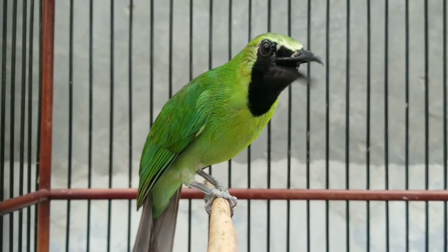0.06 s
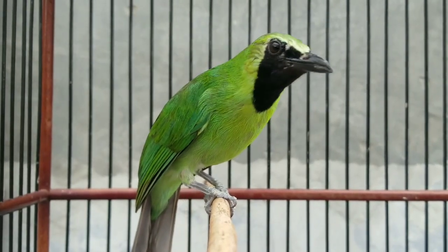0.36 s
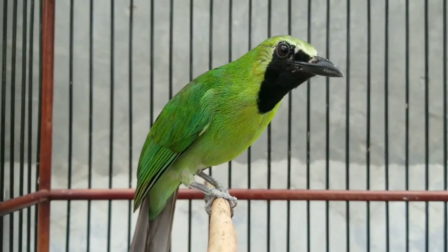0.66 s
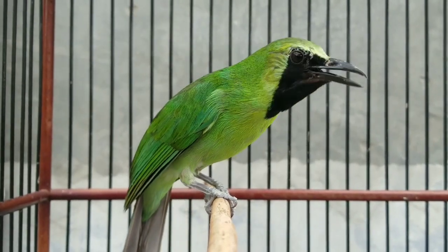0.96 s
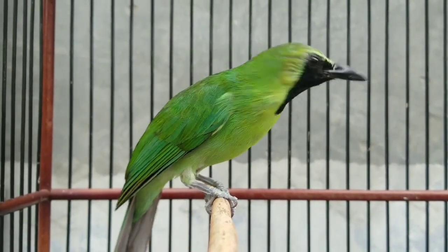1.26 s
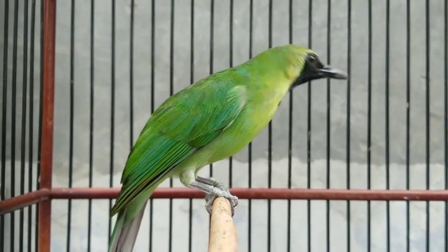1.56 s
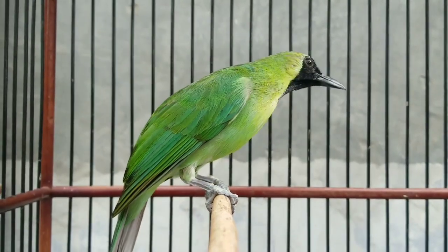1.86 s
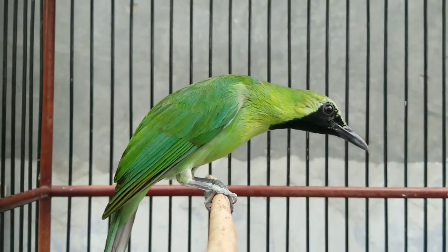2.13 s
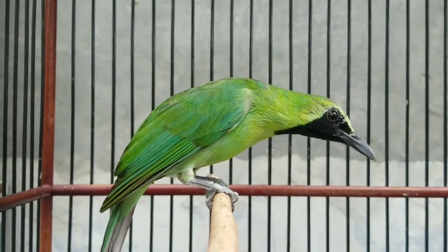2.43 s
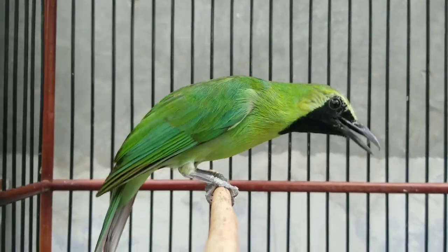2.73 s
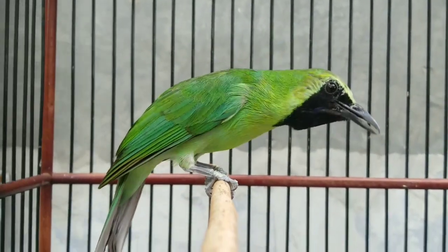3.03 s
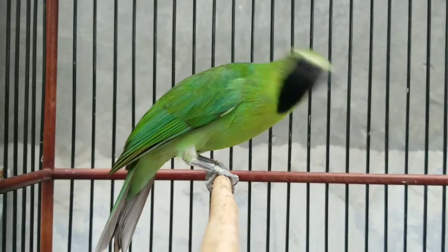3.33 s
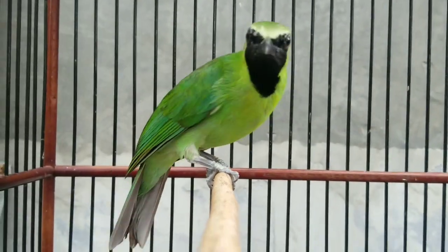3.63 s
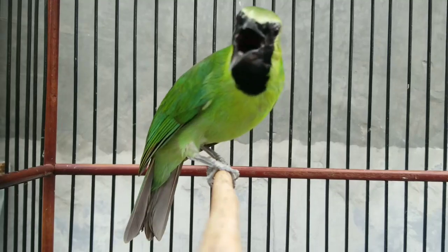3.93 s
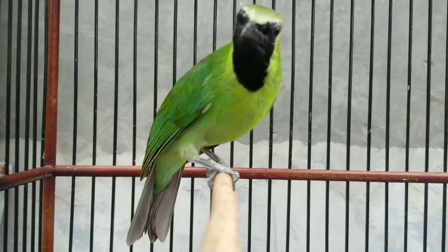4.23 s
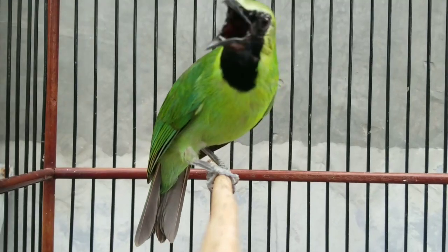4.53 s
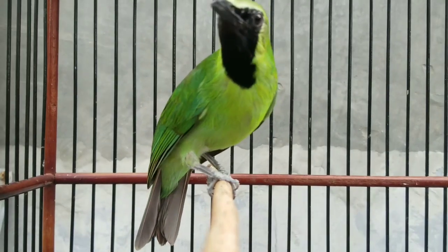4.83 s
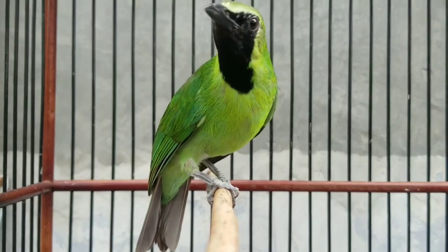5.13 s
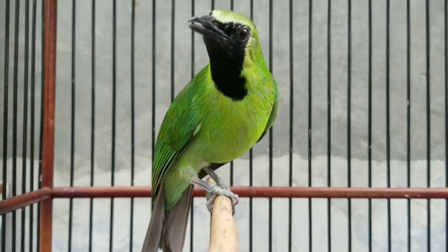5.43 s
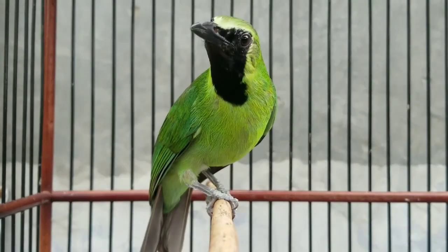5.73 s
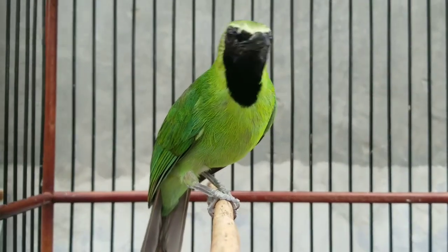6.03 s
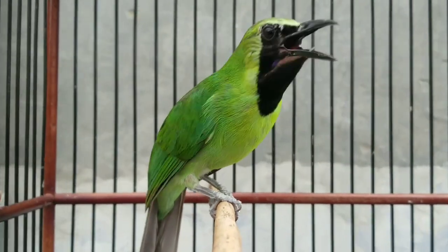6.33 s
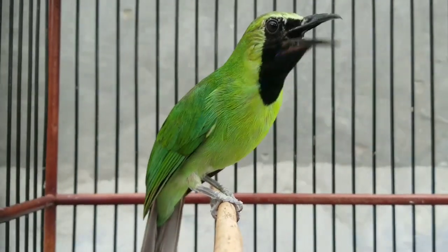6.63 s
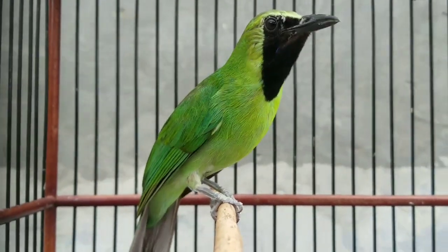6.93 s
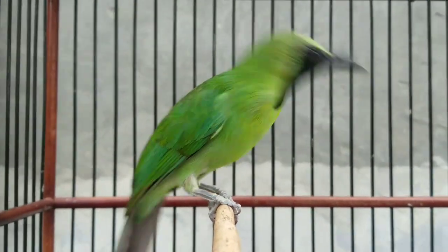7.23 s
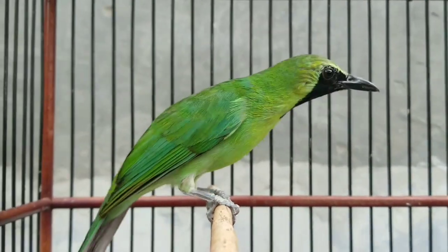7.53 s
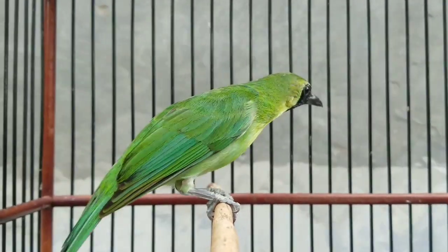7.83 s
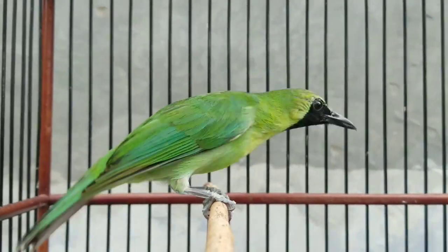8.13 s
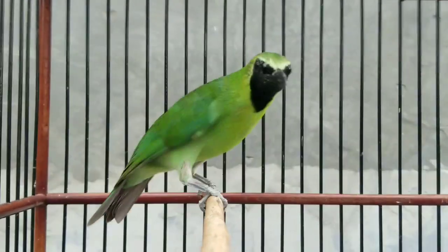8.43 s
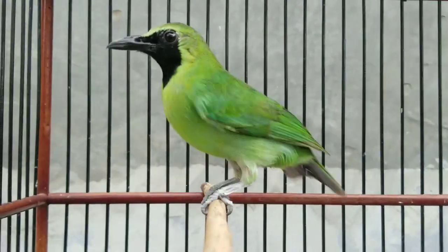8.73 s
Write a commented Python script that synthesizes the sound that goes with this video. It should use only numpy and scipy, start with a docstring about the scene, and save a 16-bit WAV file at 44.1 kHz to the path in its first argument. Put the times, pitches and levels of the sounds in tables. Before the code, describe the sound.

Loud, close birdsong in stereo, in a slightly echoing space. The bird opens with three quick chips and some downward slides, then gives a hoarse falling buzz, a piercing squeal, a short squeak and a pair of clear whistles. The singing stops, and a few light, briefly ringing thumps follow as it hops on its perch. Quiet rumble, hum, high hiss and far-off chirps lie underneath.

```python
"""A leafbird in a wire cage.

Close to a stereo microphone it sings three chips, falling slurs, a buzz, a squeal, a squeak and two
whistles, then hops on its perch, which rings. The two sides of its syrinx are separate oscillators;
where they overlap they beat and rasp. A faint room tail follows each note, over low rumble, a drone
and a hum, high hiss and far-off glides."""
import sys
import numpy as np
from scipy import signal
from scipy.fft import rfft, irfft, next_fast_len
from scipy.io import wavfile
from scipy.ndimage import uniform_filter1d, minimum_filter1d

SR = 44100
rng = np.random.default_rng(int(sys.argv[2]) if len(sys.argv) > 2 else 0)


def unload_wav(signal):
    """Save mono or channel-first audio to the path in sys.argv[1] as 16-bit WAV at rate SR, clipped to [-1, 1]."""
    wavfile.write(
        sys.argv[1],
        SR,
        np.round(np.clip(np.atleast_2d(signal).T, -1, 1) * 32767).astype(np.int16),
    )


N = 387198
TIME = np.arange(N) / SR

# Each row: start and length in seconds, top pitch in Hz, level in dB, lead of the flick in seconds,
# its pitch in Hz, its level in dB, roughness from 0 to 1, air hiss in dB.
CHIPS = [(0.048, 0.037, 3610, -11, .007, 4700, -33, 0.2, -20),
         (0.279, .029, 3470, -10, .012, 4430, -21.5, 0.25, -18),
         (0.496, 0.039, 3653, -10, .002, 4100, -43, 0.11, -28.5)]
# Glides of one side of the syrinx. Each row: start and end in seconds, first, middle and last pitch in Hz,
# level and swell in dB, attack and release in seconds, overtones in dB, final sag and quaver depth in Hz.
SLURS = [(0.745, .94, 3680, 3012, 2830, -19, -4, 0.018, 0.11, -30.5, -5, 3.5),
         (0.853, 1.006, 2760, 2498, 2240, -16, 4, 0.086, .025, -36, 40, -4),
         (2.613, 2.872, 4490, 3636, 2694, -18.5, 12.5, 0.016, 0.053, -31, 10, 58),
         (2.831, 3.014, 2450, 2397, 2340, -18.5, -2, 0.091, 0.018, -36, 81, 15.5),
         (3.009, 3.144, 2190, 2005, 1835, -17, 1.5, 0.023, 0.016, -31.5, 320, 0),
         (3.816, 4.129, 2440, 2354, 1772, -15, 2, 0.2, 0.021, -28.5, 250, -4),
         (4.39, 4.467, 2493, 2742, 2267, -20, -0.5, 0.019, 0.044, 4.5, -3, 0)]
# Calls of the high side. Each row: time in seconds, pitch in Hz, level in dB, overtones in dB.
BUZZ = [(3.797, 3300, -34.5, -37), (3.822, 4950, -23.5, -17), (3.843, 4132, -6, -30),
        (3.89, 3750, -7.5, -31), (3.91, 3704, -7, -33), (3.946, 2887, -7.5, -25), (3.99, 2700, -16, -30),
        (4.045, 2516, -18, -49), (4.115, 2165, -32, -27)]
SQUEAL = [(4.383, 4300, -27, -16), (4.404, 5020, -12.5, -25), (4.423, 5520, -7.5, -26),
          (4.465, 4530, -11.5, -16.5), (4.512, 4040, -6, -19.5), (4.595, 3476, -10.5, -26.5),
          (4.63, 3673, -4.5, -13), (4.65, 3556, -15.5, -18), (4.664, 3110, -27, -25)]
SQUEAK = [(5.487, 5550, -36.5, -13), (5.504, 5900, -23.5, -6), (5.512, 6000, -12.5, -1.5),
          (5.52, 6010, -17, -0.5), (5.543, 5460, -15, -3.5), (5.556, 5040, -13, -11),
          (5.569, 4655, -13, -27), (5.585, 4550, -7, -29.5), (5.606, 4670, -26.5, -18)]
# Each row: starts of lead-in, rise, hold and close in seconds, lead-in pitch in Hz, the four levels in dB.
WHISTLES = [(6.22, 6.266, 6.346, 6.476, 2493, -24.5, -28, -14, -23),
            (6.614, 6.647, 6.697, 6.866, 2380, -31.5, -30.5, -13.5, -14)]
# The held note, one list for each whistle. Each row: time in seconds, pitch in Hz.
HELD_PITCH = [
    [(6.352, 2730), (6.356, 2690), (6.402, 2454), (6.436, 2511), (6.472, 2503)],
    [(6.708, 2592), (6.764, 2590), (6.778, 2530), (6.828, 2562), (6.864, 2463)],
]
# Hoarse stretches. Each row: start and end in seconds, roughness from 0 to 1, flutter rate in Hz,
# air hiss in dB against the tone.
RASPS = [(.815, .93, 0.11, 103.9, -39), (2.83, 2.891, 0.31, 256.6, -37), (3.79, 3.973, 0.05, 202.3, -20),
         (3.905, 4.19, 0.37, 232.1, -20), (4.37, 4.535, 0.06, 241.3, -22.5), (3.79, 3.835, .3, 250.5, -22),
         (5.48, 5.596, .07, 194.5, -20.5), (6.47, 6.525, 0.31, 317, -19), (6.612, 6.659, 0.2, 304, -50)]
# The voice catches for an instant. Each row: time in seconds, dip in dB.
CATCHES = [(.828, -13.5), (0.867, -7), (2.781, -9), (3.867, -24), (4.502, -11), (5.544, -4.5)]
# Relative levels of the second to sixth harmonics in dB.
HARMONICS_DB = [-1, -9.5, -9, -16, -8.5]
# Colour that throat and beak give the overtones. Each row: frequency in Hz, gain in dB.
THROAT_GAIN = [(4000, 1.5), (5500, 2), (7200, -2.5), (8300, -1.5), (10500, 2.5), (12500, -3), (14000, 0.5),
               (16000, -5.5)]
# Where the head points. Each row: start in seconds, left over right in dB, left lead in radians at
# 3000 Hz, left lead in ms, left and right echo delays in ms, left and right echo shares.
HEAD_POSES = [(0, -0.4, 0.6, 0.15, 2.45, 1.517, 0.19, 0.13), (.7, -1.5, 0.73, 0.18, 1.95, 0.6, 0.27, 0.24),
              (2.5, -1, 0.49, 0.0059, 0.7, 1.075, 0.15, 0.027),
              (3.7, -2.5, 2.08, 0.13, .829, 0.22, 0.21, 0.44), (4.3, 4, 4, -0.1, 1.86, 0.88, 0.37, 0.3),
              (5.4, 3, -2.5, 0.12, 0.589, 1.3, 0.35, .6), (6.1, 2.5, 1.06, 0.018, 1.717, 1.07, 0.36, 0.062),
              (6.56, 0.6, 1.47, 0.015, 1.683, 2.982, 0.66, 0.17)]
# Feet landing on the perch. Each row: time in seconds, gain in dB.
HOPS = [(8.385, -27.5), (8.413, -18), (8.594, -26.5), (8.61, -27.5), (8.627, -47), (8.649, -17.5)]
# Each row: frequency in Hz, relative level in dB, seconds to decay by 60 dB.
PERCH_MODES = [(326.4, -7.5, 0.17), (356.5, 1, 0.12), (292, -11, 0.067), (673, -1.5, 0.035),
               (784, -14, 0.085), (2070, -9, 0.015)]
# Each row: frequency in Hz, reverberation time in seconds.
ROOM_T60 = [(300, 0.16), (2200, 0.72), (3300, 0.26), (4700, 0.72), (8000, 0.061), (15000, 0.037)]
# Spectra of the breath and the backgrounds. Each row: frequency in Hz, relative density in dB.
BREATH_SPECTRUM = [(900, -20.5), (2000, -9.5), (3500, 3), (5000, -3), (6500, -2), (8000, -8), (10000, 1),
                   (13000, -1.5), (15000, -12.5), (16000, -25)]
RUMBLE_SPECTRUM = [(15, -39), (25, -9), (48, -6), (76, -1), (125, 0), (176, -5), (247, -16), (353, -16),
                   (479, -22), (685, -23), (805, -30), (896, -28), (1110, -33), (1800, -30), (2340, -60),
                   (3960, -120)]
WASH_SPECTRUM = [(120, -39.5), (200, -0.5), (360, 3), (601, -4), (1020, -10.5), (1840, -12.5), (2290, -11),
                 (3310, -13.5), (4040, -15), (4770, -26.5), (5840, -4.5), (8420, -33.5), (11700, -19.5),
                 (14600, -36.5), (16000, -57.5)]
HISS_SPECTRUM = [(880, -28.5), (1500, -24), (2370, -13), (2590, -11), (3380, -9.5), (3690, -2.5),
                 (4240, -2), (5940, -11), (6500, -16.5), (7100, -17.5), (8320, -24), (12600, -21),
                 (16000, -43.5)]
# Swells of the backgrounds. Each row: time in seconds, level in dB before mixing.
RUMBLE_LEVEL = [(0, -60.5), (1.6, -66), (2.2, -52.5), (3.7, -45.5), (4.4, -52), (5.3, -47.5), (6.1, -55),
                (7.2, -45), (8.78, -39.5)]
WASH_LEVEL = [(0, -64), (1.25, -66), (2.5, -55.5), (3.6, -59.5), (4.6, -61), (5.8, -67), (6.6, -64.5),
              (7.4, -62.5), (8.3, -62)]
HISS_LEVEL = [(0, -57.5), (1.2, -58), (1.5, -50), (1.78, -69.5), (2.1, -52.5), (2.35, -65), (2.6, -49),
              (3.45, -50.5), (3.75, -42), (4.3, -49.5), (4.95, -43.5), (5.2, -49.5), (5.5, -43),
              (6.3, -56.5), (7.35, -44.5), (8.25, -48), (8.45, -44), (8.78, -42.5)]
# Likeness of the background at the two microphones. Each row: frequency in Hz, coherence up to 1.
COHERENCE = [(60, 1), (150, 0.82), (380, 0.46), (950, -0.053), (2380, -0.05), (5980, 0.012), (15000, -0.04)]
# Faint distant tones. Each row: blur in Hz, then points of time in seconds, pitch in Hz, level in dB.
FAR_GLIDES = [(200, [(.33, 6340, -70), (.42, 6170, -53), (.5, 6170, -64)]), (480, [(1.8, 2190, -57),
              (2.05, 3040, -60.5), (2.35, 3490, -53), (2.62, 4020, -56)]), (110, [(2.18, 4860, -62),
              (2.32, 4920, -50.5), (2.55, 4930, -76)]), (394, [(3.22, 3600, -57.5), (3.45, 3070, -48.5),
              (3.72, 2670, -61)]), (350, [(6.9, 5600, -67), (7.2, 5250, -40.5), (7.5, 4900, -51.5)]),
              (214, [(7.3, 6200, -51), (7.6, 6660, -49.5), (7.85, 6330, -52.5)]), (215, [(7.5, 4450, -56),
              (7.75, 4330, -41.5), (8.2, 3676, -51.5), (8.52, 3980, -41.5), (8.78, 3720, -51)])]
# A wavering low drone and a deeper hum. Each row: time in seconds, pitch in Hz, level in dB.
DRONE = [(0, 129.4, -73.5), (3.4, 121.6, -66), (4.4, 121.5, -51), (5.2, 118.5, -49.5), (6.3, 125.2, -66.5),
         (7.3, 119.1, -52), (8.78, 114.8, -68)]
HUM = [(1.999, 78, -61.5), (2.6, 80, -51.5), (3.8, 86, -51.5), (4.5, 84, -52.5), (5.3, 82, -48.5),
       (6.1, 84, -56), (6.6, 80, -65.5)]


def song(jitter_share=0.0045, shimmer=0.054, throb=0.94, square_db=-17, cubic_db=-8, catch_s=0.007):
    """Nonlinear coupling of the syrinx's two sides makes combination tones; breath hisses in step."""
    flutter, fray, air = hoarseness()
    jitter = jitter_share * wobble(200)
    voice, own_squares = np.zeros((2, N)), np.zeros((2, N))
    for curve in note_curves():
        start, sound = syrinx_side(curve, flutter, fray, jitter)
        add(voice, start, sound)
        add(own_squares, start, sound ** 2)
    cross_terms = voice ** 2 - own_squares  # zero unless notes overlap
    voice += cross_terms * (amp(square_db) + amp(cubic_db) * voice)
    dips_db = sum(db * np.clip(1 - abs(TIME - s) / catch_s, 0, 1) for s, db in CATCHES)
    voice *= amp(dips_db) * (1 + shimmer * wobble(110))
    envelope = np.sqrt(abs(uniform_filter1d(np.mean(voice ** 2, axis=0), size=300)))
    breath = np.array([coloured(lambda hz: amp(spectrum_at(BREATH_SPECTRUM, hz))) for mic in range(2)])
    return voice + envelope * air * (1 + throb * flutter) * breath


def syrinx_side(curve, flutter, fray, jitter, fade_s=0.0021, flutter_bend=0.19):
    """Source and filter: a harmonic glide, modulated in level and pitch, is coloured by the throat."""
    start = curve[0][0] - fade_s
    at = np.arange(round(start * SR), round((curve[-1][0] + fade_s) * SR))
    t = at / SR
    hz, level_db, overtone_db = (uniform_filter1d(c, size=90) for c in curve_at(curve, t))
    shiver = 1 + flutter[at] + fray[at]
    bent_hz = hz * (1 + jitter[at] + flutter_bend * flutter[at])
    phase = 2 * np.pi * np.cumsum(bent_hz) / SR + np.angle(shiver)
    fundamental = paths(start, hz) * np.exp(1j * phase)
    overtones = 0
    for k, db in enumerate(HARMONICS_DB, 2):
        gain = amp(db + spectrum_at(THROAT_GAIN, k * hz)) * (k * hz < SR / 2)
        overtones += gain * paths(start, k * hz) * np.exp(1j * k * phase)
    edges = np.clip(np.minimum(t - t[0], t[-1] - t) / fade_s, 0, 1)
    envelope = np.sqrt(2) * amp(level_db) * edges * abs(shiver)
    return start, envelope * (fundamental + amp(overtone_db) * overtones).real


def note_curves():
    """The song is a set of frequency and amplitude contours, one for each note."""
    curves = [BUZZ, SQUEAL, SQUEAK]
    for start, end, first, middle, last, *shape in SLURS:
        curves.append(note(start, end, (first, middle, last), *shape))
    for *row, _, _ in CHIPS:
        curves += chip(*row)
    for held_pitch, row in zip(HELD_PITCH, WHISTLES):
        curves += whistle(held_pitch, *row)
    return curves


def note(start, end, pitches, db, swell_db=0, attack=.01, release=.01, overtone_db=-28,
         sag_hz=0, quaver_hz=0):
    """A contour: pitch follows a parabola through three values, quavers, and sags as breath fails."""
    edge_db, sag_s, quaver_rate_hz = -21.5, 0.0099, 19.5
    progress = np.linspace(0, 1, 80)
    t = start + (end - start) * progress
    hz = np.polyval(np.polyfit([0, .5, 1], pitches, 2), progress)
    hz -= sag_hz * np.clip(1 - (end - t) / sag_s, 0, 1)
    hz += quaver_hz * np.cos(2 * np.pi * quaver_rate_hz * (t - start))
    closed = 1 - np.clip(np.minimum((t - start) / attack, (end - t) / release), 0, 1)
    level_db = db + swell_db * (progress - .5) + edge_db * closed
    return np.column_stack([t, hz, level_db, np.full(len(t), overtone_db)])


def chip(start, length, top_hz, db, lead_s, flick_hz, flick_db, flick_s=0.015):
    """Two fast frequency sweeps: an upward flick of the high side, then an arch of the low side."""
    early = start - lead_s
    flick = note(early, early + flick_s, flick_hz * np.array([.5, .8, .96]), flick_db,
                 attack=0.0027, release=0.0018, overtone_db=-18)
    arch = note(start, start + length, top_hz * np.array([.83, .94, .68]), db,
                attack=0.0059, release=0.0059, overtone_db=-29.5)
    return [flick, arch]


def whistle(held_pitch, start, rise, hold, until, lead_hz, lead_db, rise_db, hold_db, close_db):
    """Two oscillators alternate, high, low, high, low, and beat briefly at each handover."""
    overlap_s, close_s, close_hz = 0.011, 0.039, (2146, 2094, 1867)
    lead_in = note(start, rise + overlap_s, lead_hz * np.array([.95, .97, 1.02]), lead_db,
                   attack=0.017, release=0.012, overtone_db=-25)
    rising = note(rise - overlap_s, hold + overlap_s, lead_hz * np.array([.82, .868, .905]), rise_db,
                  swell_db=11.5, attack=0.009, release=0.0096, overtone_db=-8.5)
    held = note(hold - overlap_s / 2, until + overlap_s, (0, 0, 0), hold_db,
                swell_db=0.5, attack=0.0097, release=0.019, overtone_db=-34)
    held[:, 1] = curve_at(held_pitch, held[:, 0])[0]  # its pitch has a curve of its own
    close = note(until - overlap_s, until + close_s, close_hz, close_db,
                 attack=0.023, release=0.01, overtone_db=-29, sag_hz=330)
    return [lead_in, rising, held, close]


def hoarseness(clear_air_db=-52, unevenness=0.48, fray_share=0.76, fray_hz=500):
    """Irregular vibration: the membranes throb unevenly (flutter), shiver (fray) and leak air."""
    flutter, roughness, air = np.zeros(N), np.zeros(N), np.full(N, amp(clear_air_db))
    drift = wobble(200)
    for start, end, rough, rate_hz, air_db in rasp_spans():
        span = (TIME > start) & (TIME < end)
        depth = rough * signal.windows.tukey(span.sum(), .3)
        cycles = np.cumsum(rate_hz * (1 + unevenness * drift[span])) / SR
        flutter[span] += depth * np.cos(2 * np.pi * cycles)
        roughness[span] += depth
        air[span] += amp(air_db) * np.hanning(span.sum())
    fray = fray_share * roughness * (wobble(fray_hz) + 1j * wobble(fray_hz))
    return flutter, fray, air


def rasp_spans():
    """Fast modulation is heard as roughness: in the rasps, the chips and each turn of a whistle."""
    turn_s, turn_rough, turn_flutter_hz, turn_air_db = 0.017, 0.18, 290, -22.5
    scratch_s, scratch_rough, chip_flutter_hz = 0.007, 0.46, 394
    rows = [(s - turn_s, s + turn_s, turn_rough, turn_flutter_hz, turn_air_db)
            for _, rise, hold, until, *_ in WHISTLES for s in (rise, hold, until)]
    for start, length, _, _, lead_s, _, _, rough, air_db in CHIPS:
        rows += [(start - lead_s - scratch_s, start + scratch_s, scratch_rough, chip_flutter_hz, air_db),
                 (start, start + length, rough, chip_flutter_hz, air_db)]
    return RASPS + rows


def beak(x, cut_hz=1450):
    """An opening much smaller than the wavelength radiates poorly, so it acts as a high-pass."""
    return signal.sosfiltfilt(signal.butter(5, cut_hz, "highpass", fs=SR, output="sos"), x)


def paths(s, hz, reference_hz=3000):
    """Comb filtering: at each microphone the direct sound interferes with one bounce off the cage."""
    _, pan_db, lead_rad, lead_ms, *bounces = [pose for pose in HEAD_POSES if pose[0] <= s][-1]
    echo_ms, echo_share = np.reshape(bounces, (2, 2, 1))
    sides, per_ms = np.array([[.5], [-.5]]), 2j * np.pi / 1000
    lead = 1j * lead_rad + per_ms * (hz - reference_hz) * lead_ms
    direct = amp(sides * pan_db) * np.exp(sides * lead)
    echo = echo_share * np.exp(-per_ms * hz * echo_ms)
    return direct * (1 + echo) / np.sqrt(1 + echo_share ** 2)


def perch(attack_s=0.0056):
    """Each footfall excites the damped modes of the wooden perch and the cage frame."""
    out, t = np.zeros((2, N)), np.arange(SR // 3) / SR
    ring = sum(amp(db - 60 * t / t60) * np.sin(2 * np.pi * hz * t) for hz, db, t60 in PERCH_MODES)
    ring *= 1 - np.exp(-t / attack_s)
    for s, db in HOPS:
        add(out, s, amp(db) * ring * amp([[-1], [1]]))  # slightly to the right
    return out


def room(x, tail_db=-36, tail_build_s=0.049, early_db=-27, early_decay_s=0.02):
    """Reverberation: early reflections from cage and wall, then a tail whose decay varies with pitch."""
    hz, frame_s, spectra = signal.stft(rng.standard_normal((2, SR)), SR, nperseg=256)
    decay = amp(-60 * frame_s / spectrum_at(ROOM_T60, hz)[:, None])
    tail = signal.istft(spectra * decay, SR, nperseg=256)[1][:, :SR]
    t = TIME[:SR]
    tail *= 1 - np.exp(-t / tail_build_s)
    early = rng.standard_normal((2, SR)) * np.exp(-t / early_decay_s) * (t > .001)
    response = amp(tail_db) * tail / np.linalg.norm(tail[0])
    response += amp(early_db) * early / np.linalg.norm(early[0])
    return signal.fftconvolve(x, response, axes=1)[:, :N]


def far_tones():
    """Distant glides are incoherent between the microphones; the low hum and drone are coherent."""
    out = np.zeros((2, N))
    for blur_hz, rows in FAR_GLIDES:
        add(out, rows[0][0], np.array([blurred_tone(rows, blur_hz) for mic in range(2)]))
    add(out, HUM[0][0], blurred_tone(HUM, blur_hz=16)[None])
    add(out, DRONE[0][0], blurred_tone(DRONE, blur_hz=6.9)[None])
    return out


def blurred_tone(rows, blur_hz):
    """Random modulation spreads a gliding carrier into a narrow band of noise."""
    t = np.arange(rows[0][0], rows[-1][0], 1 / SR)
    hz, level_db = curve_at(rows, t)
    size = next_fast_len(len(t))
    band = np.exp(-(np.fft.fftfreq(size, 1 / SR) / blur_hz) ** 2)
    blur = np.fft.ifft(band * (rng.standard_normal(size) + 1j * rng.standard_normal(size)))[:len(t)]
    carrier = np.exp(2j * np.pi * np.cumsum(hz) / SR)
    return amp(level_db) * unit((blur * carrier).real)


def surroundings():
    """Independent noises add in power: low rumble, a soft wash and a patchy high hiss."""
    rumble = diffuse_noise(RUMBLE_SPECTRUM, RUMBLE_LEVEL, patchy_db=2.2)
    wash = diffuse_noise(WASH_SPECTRUM, WASH_LEVEL, patchy_db=3.5)
    hiss = diffuse_noise(HISS_SPECTRUM, HISS_LEVEL, patchy_db=3.5)
    return rumble + amp(5.5) * wash + hiss


def diffuse_noise(spectrum, level, patchy_db):
    """A diffuse field is coherent only at low frequencies; its spectrum drifts in random patches."""
    hz, frames = np.fft.rfftfreq(2048, 1 / SR), N // 512 + 5
    left_re, left_im, other_re, other_im, patches = rng.standard_normal((5, frames, len(hz)))
    patches = unit(uniform_filter1d(uniform_filter1d(patches, size=14, axis=0), size=20, axis=1))
    gain = amp(spectrum_at(spectrum, hz) + patchy_db * patches)
    gain /= np.linalg.norm(gain, axis=1, keepdims=True)
    shared = np.sqrt(np.clip(spectrum_at(COHERENCE, hz), 0, 1))
    left = left_re + 1j * left_im
    right = shared * left + np.sqrt(1 - shared ** 2) * (other_re + 1j * other_im)
    spectra = gain * np.array([left, right])
    noise = signal.istft(spectra, nperseg=2048, noverlap=1536, time_axis=1, freq_axis=2)[1][:, :N]
    return amp(curve_at(level, TIME)[0]) * unit(noise)


def wobble(rate_hz):
    """Low-pass noise: a waver no faster than about rate_hz."""
    return coloured(lambda hz: np.exp(-(hz / rate_hz) ** 2))


def coloured(gain):
    """White noise filtered by gain(Hz), at rms 1."""
    return unit(irfft(rfft(rng.standard_normal(N)) * gain(np.fft.rfftfreq(N, 1 / SR)), N))


def amp(db):
    """Decibels to amplitude ratio."""
    return 10 ** (np.asarray(db) / 20)


def unit(x):
    """Normalises to rms 1."""
    return x / np.sqrt(np.mean(x ** 2) + 1e-20)


def spectrum_at(points, hz):
    """Interpolates (Hz, value) points on a log-frequency axis."""
    f, value = np.transpose(points)
    return np.interp(np.log(hz + 1), np.log(f + 1), value)


def curve_at(rows, t):
    """Interpolates every column of a curve at the times t."""
    s, *columns = np.transpose(rows)
    return [np.interp(t, s, column) for column in columns]


def add(mix, s, sound):
    """Superposes a sound on the stereo mix at time s."""
    part = mix[:, max(round(s * SR), 0):][:, :sound.shape[1]]
    part += sound[:, :part.shape[1]]


def scene():
    """Superposition of the bird and its perch, their reverberation and the background."""
    near = beak(song()) + perch()
    return near + room(near) + surroundings() + far_tones()


def record(dry, ceiling=0.93, edge_hz=15900):
    """Peak limiting holds the loudest notes just under full scale; a low-pass limits the band."""
    allowed = np.minimum(1, ceiling / (abs(dry).max(axis=0) + 1e-9))
    limited = dry * uniform_filter1d(minimum_filter1d(allowed, size=200), size=200)
    low_pass = signal.firwin(511, edge_hz, window=("kaiser", 9), fs=SR)
    return signal.oaconvolve(limited, low_pass[None], "same", axes=1)


dry = scene()
out = record(dry)
unload_wav(out)
```